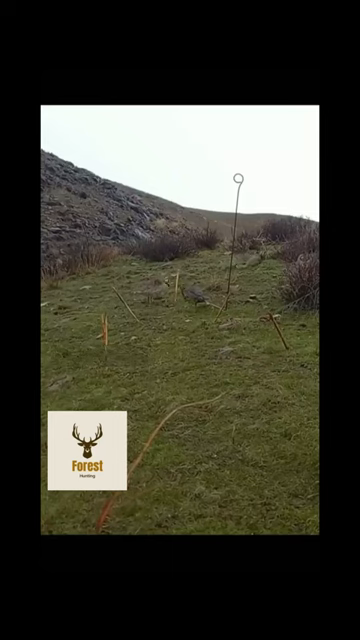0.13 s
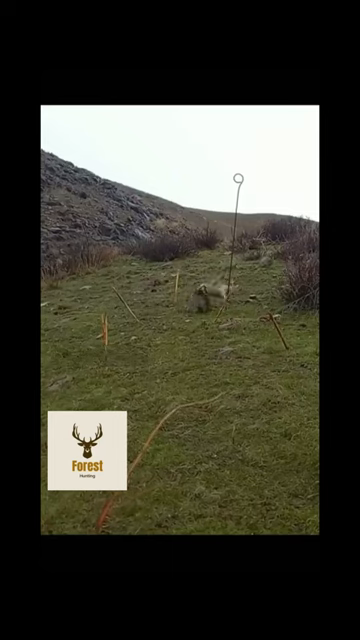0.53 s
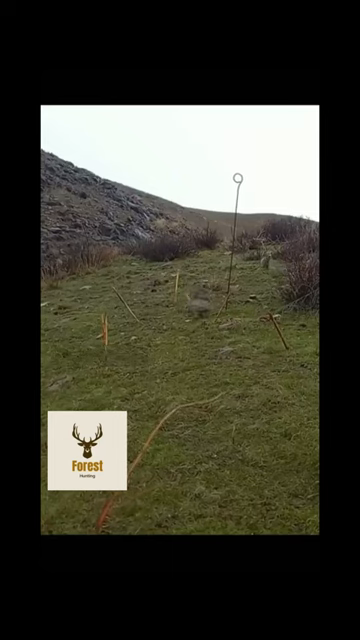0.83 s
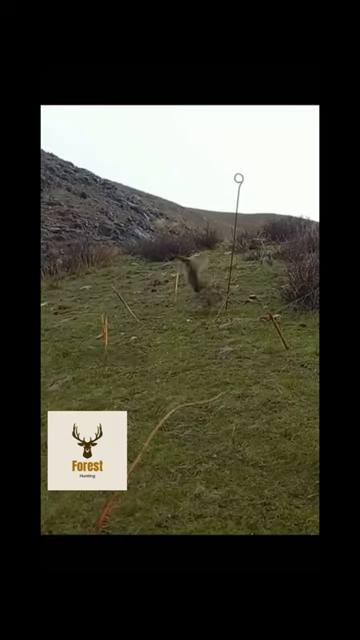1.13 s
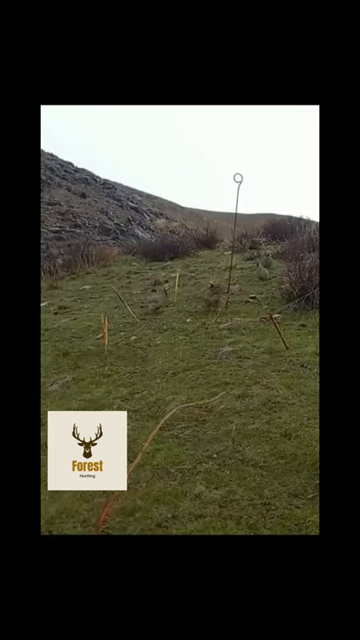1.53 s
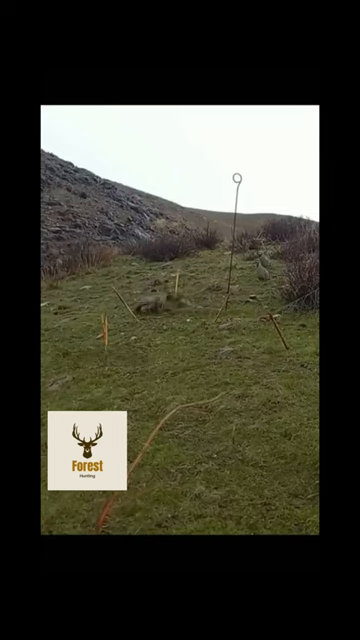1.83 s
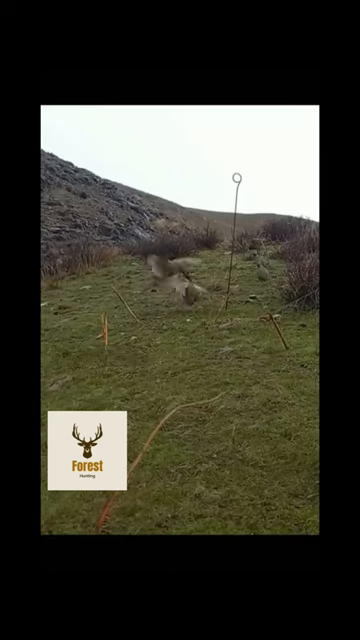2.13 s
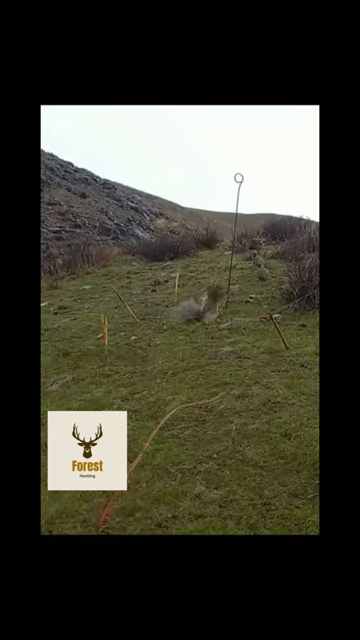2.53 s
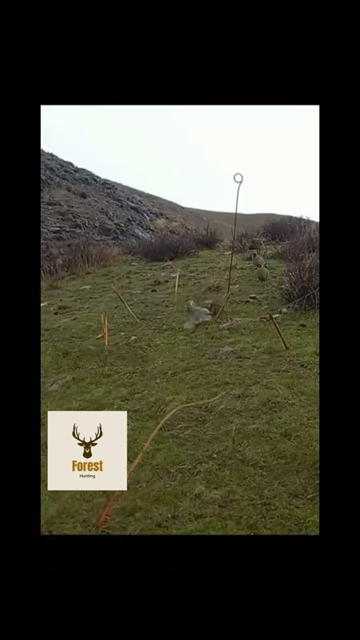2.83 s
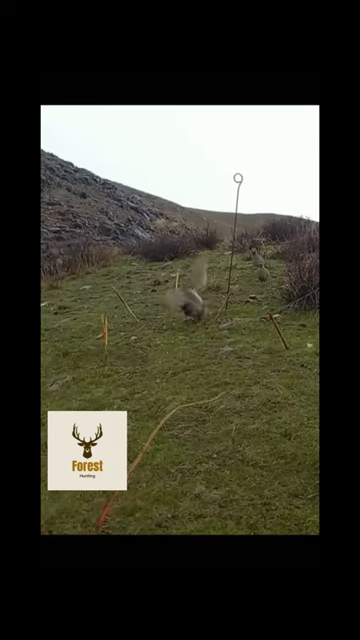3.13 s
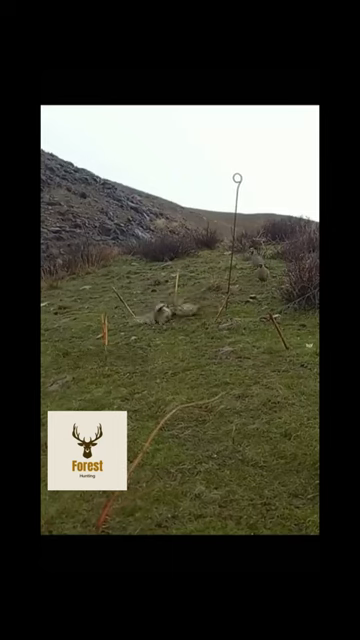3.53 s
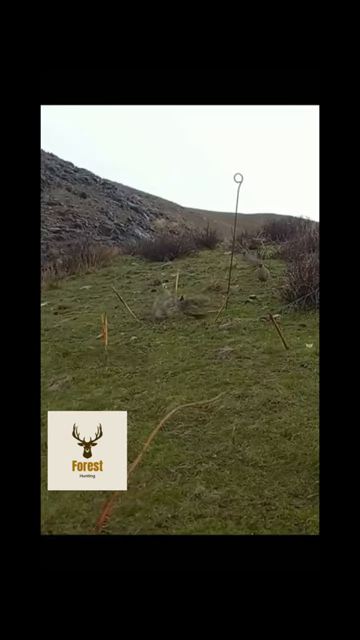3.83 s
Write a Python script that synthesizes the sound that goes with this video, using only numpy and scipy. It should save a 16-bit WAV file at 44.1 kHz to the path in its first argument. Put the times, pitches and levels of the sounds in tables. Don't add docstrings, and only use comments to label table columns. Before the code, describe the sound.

Partridges scuffle on a windy open slope. After 0.15 s of silence come low pulsed clucks, an early slap at 0.3 and hoarse squawks near 0.7, 1.2 and 1.5, with a dull knock at 1.3. Wings flurry and slap at 2.25-2.7; bright whistles jump at 2.85 and 3.2. Harder slaps and flaps fill 3.4-3.75, with another squawk. Distant birds rasp; wind rumbles and thuds on the small microphone.

```python
import sys
import numpy as np
from scipy import signal
from scipy.fft import rfft, irfft
from scipy.io import wavfile
from scipy.ndimage import uniform_filter1d

SR = 44100
rng = np.random.default_rng(int(sys.argv[2]) if len(sys.argv) > 2 else 0)


def attenuation_scalar(level_db):
    decades = np.asarray(level_db, float) / 20
    return 10 ** decades


def generate_wav(signal):
    frames = np.transpose(np.atleast_2d(signal))
    scaled = np.clip(frames, -1, 1) * 32767
    pcm = np.round(scaled).astype(np.int16)
    wavfile.write(sys.argv[1], SR, pcm)


N = 176400

# (time [s], level [dB])
GUST_STRENGTH = [(.15, -39), (.32, -45), (.45, -47), (.8, -42), (1.3, -40), (1.751, -42.5), (1.88, -36.5),
                 (2.07, -46.5), (2.128, -29.5), (2.3, -46), (2.45, -22), (2.8, -37.5), (3.148, -37.5),
                 (3.28, -24.5), (3.82, -48), (4.0, -38.5)]
# (frequency [Hz], level [dB per Hz])
RUMBLE_COLOUR = [(20, -22), (41, -7), (64, 3), (105, -5), (225, -24), (600, -50)]
# (frequency [Hz], level [dB per Hz])
WASH_COLOUR = [(180, 1.5), (800, 2), (2000, -7.5), (4500, -3), (8200, -15), (13800, -12), (15000, -54)]
# (time [s], peak [dB], ringing pitch [Hz])
BUFFETS = [(.3, -24, 72.6), (0.886, -28.5, 67), (1.16, -26, 83), (1.331, -23.5, 64.5), (1.653, -26.5, 55),
           (1.861, -16, 61.4), (1.912, -22.5, 70), (2.099, -13.5, 70), (2.141, -13, 64), (1.989, -25.5, 66),
           (2.423, -10.5, 77), (2.47, -17.5, 70), (2.66, -12.5, 100.7), (2.919, -23, 77), (3.048, -25, 65),
           (3.1, -23, 75), (3.175, -18, 67), (3.261, -12.5, 57), (3.565, -15, 102), (3.77, -23.5, 58),
           (3.8, -13, 59)]
# (start [s], length [s], pitch [Hz])
WHINES = [
    (2.2, .8, 13609),
    (2.39, .26, 10163),
]
# (start [s], length [s], level [dB])
FAR_RASPS = [(0.111, 0.24, -28.5), (0.454, 0.14, -30.5), (0.58, 0.17, -41.5), (0.871, 0.19, -32.5),
             (1.029, 0.31, -36.5), (1.253, 0.2, -34.5), (1.377, 0.16, -32.5), (1.624, 0.28, -26),
             (1.976, 0.074, -29), (2.012, 0.27, -28.5), (2.813, 0.041, -29.5), (2.993, 0.14, -38.5),
             (3.191, 0.038, -30), (3.804, 0.096, -45.5), (1.862, .1, -43.5), (3.907, 0.084, -32.5),
             (3.972, 0.056, -35)]
# (start [s], feather hiss [dB], air push [dB])
WING_STROKES = [(0.601, -37, -35), (2.253, -40.5, -36), (2.291, -40.5, -34.5), (2.326, -37, -28),
                (2.403, -41.5, -25.5), (2.442, -28.5, -25), (2.524, -32, -27), (2.594, -36.5, -24),
                (2.664, -36.5, -26), (2.713, -51, -71), (3.369, -36.5, -60), (3.408, -26, -22.5),
                (3.472, -28, -21.5), (3.506, -36, -33), (3.547, -43, -23), (3.578, -32, -29),
                (3.62, -32, -21), (3.724, -42, -39)]
# (frequency [Hz], level [dB per Hz])
FEATHER_COLOUR = [(900, -16.5), (4800, -12), (9700, -24), (12700, -13.5), (15000, -36)]
# (frequency [Hz], level [dB per Hz])
PUSH_COLOUR = [(55, -6.5), (90, -13), (630, -20), (1500, -32.5), (2600, -44)]
# (time [s], peak [dB], centre frequency [Hz])
TICKS = [(0.609, -24.5, 8900), (.795, -21, 6800), (0.861, -32, 406), (1.282, -29.5, 980),
         (2.297, -28, 1470), (2.33, -24, 4970), (2.408, -28, 900), (2.533, -24, 6060), (2.677, -12.5, 1700),
         (2.718, -19, 2500), (2.732, -23, 6940), (2.746, -23.5, 4930), (2.986, -27.5, 2500),
         (3.217, -23.5, 1170), (3.37, -22, 6000), (3.425, -18, 4020), (3.551, -14, 7200),
         (3.612, -11.5, 1520), (3.731, -21.5, 7300), (3.741, -24.5, 6060)]
# (time [s], peak [dB])
SLAPS = [
    (0.293, -11.5),
    (2.391, -4.5),
    (2.609, -24),
    (2.674, -6.5),
    (3.407, -11),
    (3.492, -5),
    (3.585, -3),
]
# (time [s], peak [dB])
KNOCKS = [
    (1.307, -8.5),
    (2.366, -1.5),
    (2.675, -5),
]
# (start [s], length [s], level [dB], first pitch [Hz], last pitch [Hz])
SQUEAKS = [(0.27, 0.011, -23, 2320, 3900), (1.718, 0.019, -26, 3730, 4200),
           (1.749, 0.022, -21.5, 3620, 3950), (2.428, 0.027, -21.5, 5180, 4720),
           (2.451, 0.04, -20.5, 4960, 4400), (2.819, .012, -34.5, 1770, 2030),
           (3.197, .012, -36.5, 1820, 2090), (3.931, 0.032, -32.5, 4200, 4050)]
# (time [s], pitch [Hz], level [dB])
WHISTLES = [
    [(2.05, 3075, -37), (2.062, 2500, -35), (2.077, 3034, -21.5), (2.081, 4880, -23), (2.09, 2424, -25.5),
     (2.103, 3060, -21), (2.108, 4440, -30)],
    [(2.832, 2670, -27.5), (2.849, 3294, -19.5), (2.851, 5075, -15.5), (2.861, 4500, -16),
     (2.883, 5120, -12.5), (2.892, 4500, -20), (2.894, 2640, -23), (2.906, 3120, -22), (2.912, 3200, -18)],
    [(3.205, 3714, -29), (3.217, 2686, -25.5), (3.229, 3340, -18), (3.232, 5000, -13.5),
     (3.245, 4850, -17.5), (3.268, 5210, -14), (3.281, 4500, -10.5), (3.294, 5000, -14.5),
     (3.303, 2270, -16)],
    [(3.642, 3190, -19), (3.655, 2723, -13.5), (3.664, 3390, -18), (3.666, 5030, -16.5), (3.675, 4970, -17)],
]
# (start [s], length [s], level [dB], top pitch [Hz], beak resonance [Hz])
SQUAWKS = [
    (0.706, 0.074, -13.5, 2294, 3640),
    (1.158, 0.07, -16, 2313, 3410),
    (1.486, 0.086, -16, 2306, 3080),
    (2.411, 0.089, -19, 2500, 3500),
    (3.598, 0.1, -18, 2272, 3830),
]
# (frequency [Hz], width [Hz], level [dB])
THROAT = [
    (800, 845, 1.5),
    (1500, 1640, -4.5),
    (2510, 2570, -4),
    (3900, 4700, -16),
]
# (start [s], length [s], level [dB], first pitch [Hz], last pitch [Hz])
CLUCKS = [
    (.218, 0.062, -20, 800, 819),
    (1.805, 0.041, -21, 695, 692),
]
CROAKS = [(.135, 0.041, -28.5, 593, 564), (.175, 0.055, -25.5, 558, 917), (.6, 0.037, -35, 646, 505),
          (3.055, 0.054, -33, 612, 613), (2.97, 0.023, -38, 501, 524),
          (3.915, 0.066, -36.5, 602, 638),(.5, 0.052, -23.5, 746, 602), (.755, 0.04, -22.5, 747, 601),
          (1.005, 0.068, -26, 1000, 539), (1.205, 0.031, -30.5, 680, 617), (1.415, 0.048, -30, 621, 800),
          (1.46, 0.054, -23, 583, 767.5), (1.555, 0.041, -28.5, 659, 620), (1.72, 0.11, -24, 630, 677),
          (2.108, 0.051, -23, 730, 998)]
MURMURS = [
    (.368, 0.033, -28.5, 473, 596),
    (.455, 0.047, -31.5, 727, 900),
    (.69, 0.047, -24, 574, 601),
    (1.125, 0.046, -32, 593, 630),
    (1.312, .038, -24, 404, 800),
]
CAWS = [
    (2.484, 0.0287, -19, 810, 789),
    (2.906, 0.0356, -26, 800, 760),
    (3.293, 0.032, -24.5, 877, 683),
    (3.676, 0.035, -22, 800, 728),
]
CREAKS = [
    (.912, 0.1, -29, 809, 1096),
]

LUMP_S, LUMPS_DB, SHIMMER_DB = .025, 3.0, 2.0
WASH_DB, WASH_FOLLOWS = -39.5, 0.39
BUFFET_RISE_S, BUFFET_FADE_S = 0.0177, 0.018
ECHO_DB, ECHO_T60_S = -19, .05
RASP_HZ, RASP_WIDTH_HZ, RASP_FLUTTER_DB, RASP_VOICE = 4500, 2290, 6, .75
STROKE_RISE_S, HISS_FADE_S, PUSH_FADE_S, CRACKLE_DB = 0.011, 0.032, 0.044, 3.5
TICK_S, TICK_WIDTH = .0035, .9
CRACK_S, CRACK_HZ, THUMP_HZ, THUMP_S, THUMP_DB = 0.0012, 2500, 278, 0.0023, -18.5
SQUEAK_ROUGH = .03
WHISTLE_AIR_DB, OCTAVE_DB, JUMP_DIP_DB = -13, -19, 11
SQUAWK_AIR_DB, SQUAWK_LOW, SQUAWK_JITTER, SQUAWK_WOBBLE, BEAK_WIDTH_HZ = -7, .72, .05, .12, 2300
CLEAN, HUSKY, WIDE_OPEN, HOARSE = .11, .17, .34, .44
SHUT_TOP_HZ, VOICE_TOP_HZ = 1530, 7020
WHINE_DB, EDGE_HZ, START_S = -57, 15200, .15


def evened(x):
    return x / np.sqrt(np.mean(x ** 2) + 1e-20)


def add(mix, s, sound):
    part = mix[round(s * SR):][:len(sound)]
    part += sound[:len(part)]


def resonate(x, hz, width):
    turn = np.exp(2j * np.pi * np.cumsum(hz * np.ones(len(x))) / SR)
    r = np.exp(-np.pi * width / SR)
    return 2 * (turn * signal.lfilter([1 - r], [1, -r], x / turn)).real


def resonate_twice(x, hz, width):
    return resonate(resonate(x, hz, width), hz, width)


def dulled(x, top_hz, order):
    return signal.sosfilt(signal.butter(order, top_hz, fs=SR, output="sos"), x)


def coloured(points):
    f, level = np.transpose(points)
    shape = np.interp(np.log(np.fft.rfftfreq(N, 1 / SR) + 1), np.log(f), level, -90, -90)
    return evened(irfft(rfft(rng.standard_normal(N)) * attenuation_scalar(shape), N))


def wobble(seconds):
    width = max(round(seconds * SR), 2)
    return evened(uniform_filter1d(uniform_filter1d(rng.standard_normal(N), width), width))


def swell(length, rise, fall):
    u = np.arange(round(length * SR)) / (length * SR)
    ramp = np.clip(np.minimum(u / rise, (1 - u) / fall), 0, 1)
    return u, np.sin(np.pi / 2 * ramp) ** 2


def cut(x, s, u):
    return np.resize(x[round(s * SR):], len(u))


def wind():
    gust_db = np.interp(np.arange(N) / SR, *np.transpose(GUST_STRENGTH))
    rumble = attenuation_scalar(gust_db + LUMPS_DB * wobble(LUMP_S)) * coloured(RUMBLE_COLOUR)
    wash_db = WASH_DB + WASH_FOLLOWS * (gust_db + 24.0) + SHIMMER_DB * wobble(LUMP_S)
    return rumble + attenuation_scalar(wash_db) * coloured(WASH_COLOUR)


def buffets():
    out, t = np.zeros(N), np.arange(SR // 6) / SR
    after_peak = t - BUFFET_RISE_S
    env = np.minimum(t / BUFFET_RISE_S, 1) ** 2 * np.exp(-np.maximum(after_peak, 0) / BUFFET_FADE_S)
    for s, db, hz in BUFFETS:
        add(out, s, attenuation_scalar(db) * env * np.cos(2 * np.pi * hz * after_peak))
    return out


def whines():
    out = np.zeros(N)
    for s, length, hz in WHINES:
        u, env = swell(length, 0.06, 0.046)
        add(out, s, attenuation_scalar(WHINE_DB) * env * np.sin(2 * np.pi * hz * u * length))
    return out


def slope(x):
    t = np.arange(SR // 8) / SR
    signs = rng.choice([-1., 1.], len(t))
    present = rng.random(len(t)) < .05
    taps = signs * present * attenuation_scalar(-60 * t / ECHO_T60_S) * (t > .003)
    return signal.fftconvolve(x, taps / np.linalg.norm(taps))[:N]


def rasps():
    out, air, slow, flutter = np.zeros(N), rng.standard_normal(N), wobble(0.016), wobble(0.0085)
    for s, length, db in FAR_RASPS:
        u, env = swell(length, 0.53, 0.66)
        hz = RASP_HZ * (1 + .11 * cut(slow, s, u))
        wide = evened(resonate_twice(cut(air, s, u), RASP_HZ, RASP_WIDTH_HZ))
        narrow = evened(resonate_twice(cut(air, s + 0.27, u), hz, 240))
        level = attenuation_scalar(db + RASP_FLUTTER_DB * cut(flutter, s, u) / 2)
        add(out, s, env * level * evened(wide + RASP_VOICE * narrow))
    return out


def wings():
    out, t = np.zeros(N), np.arange(SR // 8) / SR
    rustle = coloured(FEATHER_COLOUR[:3]) * attenuation_scalar(CRACKLE_DB * wobble(0.0028))
    fizz = coloured(FEATHER_COLOUR[2:]) * attenuation_scalar(CRACKLE_DB * wobble(0.0028))
    hiss = rustle + attenuation_scalar(-7.5) * fizz
    push = coloured(PUSH_COLOUR) * attenuation_scalar(3.9 * wobble(0.0029))
    rise = np.minimum(t / STROKE_RISE_S, 1)
    for s, hiss_db, push_db in WING_STROKES:
        feathers = attenuation_scalar(hiss_db) * np.exp(-t / HISS_FADE_S) * cut(hiss, s, t)
        pushed_air = attenuation_scalar(push_db) * np.exp(-t / PUSH_FADE_S) * cut(push, s, t)
        add(out, s, 2 * rise * (feathers + pushed_air))
    return out


def ticks():
    out, t = np.zeros(N), np.arange(600) / SR
    for s, db, hz in TICKS:
        burst = rng.standard_normal(len(t)) * np.exp(-t / TICK_S)
        snap = resonate_twice(burst, hz, hz * TICK_WIDTH)
        add(out, s, attenuation_scalar(db) * snap / abs(snap).max())
    return out


def slaps():
    out, t = np.zeros(N), np.arange(800) / SR
    thump = np.sin(2 * np.pi * THUMP_HZ * t) * np.exp(-t / THUMP_S)
    for s, db in SLAPS:
        burst = rng.standard_normal(len(t)) * np.exp(-t / CRACK_S) * np.minimum(t / 0.0011, 1)
        crack = resonate_twice(burst, CRACK_HZ, 3400)
        add(out, s, attenuation_scalar(db) * (crack / abs(crack).max() + attenuation_scalar(THUMP_DB) * thump))
    return out


def knocks():
    out, t = np.zeros(N), np.arange(800) / SR
    env = np.exp(-t / 0.0027) * np.minimum(t / 0.0009, 1) ** 2
    falling = np.sin(2 * np.pi * 30 * np.sqrt(t))
    for s, db in KNOCKS:
        add(out, s, -attenuation_scalar(db) * falling * env)
    return out


def squeaks():
    out, jitter = np.zeros(N), wobble(0.00071)
    for s, length, db, hz0, hz1 in SQUEAKS:
        u, env = swell(length, 0.34, 0.18)
        hz = (hz0 + (hz1 - hz0) * u ** 2) * (1 + SQUEAK_ROUGH * cut(jitter, s, u))
        level = attenuation_scalar(db + 1.5 + 4 * cut(jitter, s + 0.029, u))
        add(out, s, level * env * np.sin(2 * np.pi * np.cumsum(hz) / SR))
    return out


def whistles():
    out, air, slow = np.zeros(N), rng.standard_normal(N), wobble(0.0032)
    for rows in WHISTLES:
        times, pitches, levels = np.transpose(rows)
        start, length = times[0], times[-1] - times[0]
        u, env = swell(length, 0.0086, 0.0088)
        t = start + u * length
        path = np.interp(t, times, pitches)
        hz = uniform_filter1d(path, size=60) * (1 + 0.008 * cut(slow, start, u))
        phase = 2 * np.pi * np.cumsum(hz) / SR
        octave = attenuation_scalar(OCTAVE_DB) * (hz < 3500) * np.sin(2 * phase)
        breath = evened(resonate_twice(cut(air, start, u), hz, 1100))
        tone = np.sqrt(2) * (np.sin(phase) + octave) + attenuation_scalar(WHISTLE_AIR_DB) * breath
        dip_db = JUMP_DIP_DB * np.tanh(abs(np.gradient(path)) / 10)
        level_db = np.interp(t, times, levels) - dip_db + 0.94 * cut(slow, start + 0.37, u)
        add(out, start, env * attenuation_scalar(level_db) * tone)
    return out


def squawks():
    out, jitter, slow, air = np.zeros(N), wobble(0.00073), wobble(0.00343), rng.standard_normal(N)
    for s, length, db, top_hz, beak_hz in SQUAWKS:
        u, env = swell(length, .4, .3)
        arch = SQUAWK_LOW + (1 - SQUAWK_LOW) * np.sin(np.pi * u ** 1.3) ** 2
        unsteady = 1 + SQUAWK_JITTER * cut(jitter, s, u) + SQUAWK_WOBBLE * cut(slow, s, u)
        turns = np.cumsum(top_hz * arch * unsteady) / SR
        partials = [(.5, 0.68), (1, 0.74), (1.5, 0.39), (2, 0.52)]
        folds = sum(g * np.cos(2 * np.pi * k * turns) for k, g in partials)
        breath = cut(air, s, u)
        drive = evened(folds) + attenuation_scalar(SQUAWK_AIR_DB) * 2 * breath
        voice = dulled(resonate_twice(drive, beak_hz, BEAK_WIDTH_HZ), VOICE_TOP_HZ, 8)
        hiss = resonate(resonate(breath, 14500, 1700), 9700, 1700)
        voice = evened(voice) + attenuation_scalar(-24) * evened(hiss)
        add(out, s, attenuation_scalar(db + 2.3 * cut(slow, s + 0.0552, u)) * env * evened(voice))
    return out


def clucks(notes, rough, open_db, stretch=1, count=4, mouth_db=-40):
    out, jitter, slow, air = np.zeros(N), wobble(0.0013), wobble(0.0062), rng.standard_normal(N)
    for s, length, db, hz0, hz1 in notes:
        u, env = swell(length, .4, .13)
        glide = hz0 + (hz1 - hz0) * u
        hz = glide * (1 + rough * (0.356 * cut(jitter, s, u) + 0.1535 * cut(slow, s, u)))
        turns = np.cumsum(hz) / SR
        folds = sum(np.cos(2 * np.pi * k * turns) for k in range(1, 10))
        breath = (0.3 + np.exp(-(turns % 1) / 0.23)) * cut(air, s, u)
        drive = (1 - rough) * evened(folds) + rough * evened(breath)
        voice = np.zeros(len(u))
        for k, (f, width, gain_db) in enumerate(THROAT[:count]):
            opening = (-np.sqrt(env)) ** k * attenuation_scalar(gain_db + open_db * k)
            voice += opening * resonate_twice(drive, f * stretch, width)
        mouth = resonate_twice(drive, 2 * glide, 900)
        voice = evened(voice) + attenuation_scalar(mouth_db) * evened(mouth)
        add(out, s, attenuation_scalar(db + 2.7 * rough * cut(slow, s + 0.024, u)) * env * evened(voice))
    return out


def scene():
    shut = dulled(clucks(MURMURS, HUSKY, 0, count=1, mouth_db=-2), SHUT_TOP_HZ, 6)
    low = clucks(CLUCKS, CLEAN, 0) + clucks(CAWS, WIDE_OPEN, 2.86)
    low += clucks(CROAKS, HOARSE, -2.5, count=3, mouth_db=-1.5)
    low += clucks(CREAKS, CLEAN, 10.0, stretch=2.0, count=2)
    voices = shut + dulled(low + rasps(), VOICE_TOP_HZ, 8) + squawks() + whistles() + squeaks()
    birds = voices + wings() + slaps() + knocks() + ticks()
    return (birds + attenuation_scalar(ECHO_DB) * slope(birds) + wind() + buffets())[None]


def top_cut(x):
    return signal.sosfilt(signal.butter(12, 16610, fs=SR, output="sos"), x)


def record(dry):
    limited = np.tanh((dry + whines()) / 0.83)
    started = limited * (np.arange(N) >= START_S * SR)
    mix = dulled(started, EDGE_HZ, 10)
    return top_cut(mix)


dry = scene()
out = record(dry)
generate_wav(out)
```